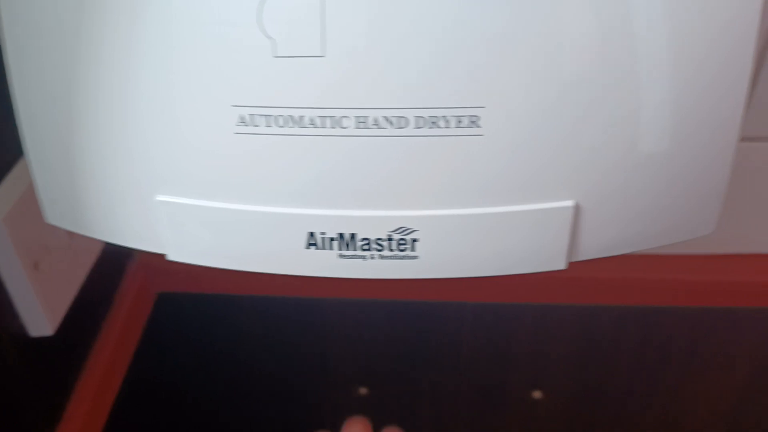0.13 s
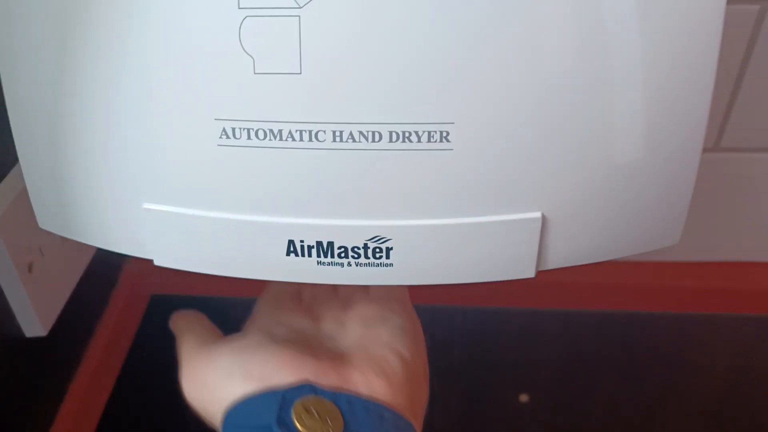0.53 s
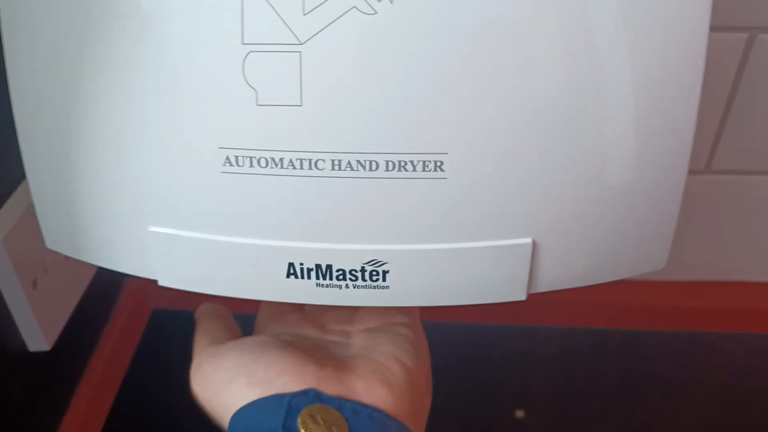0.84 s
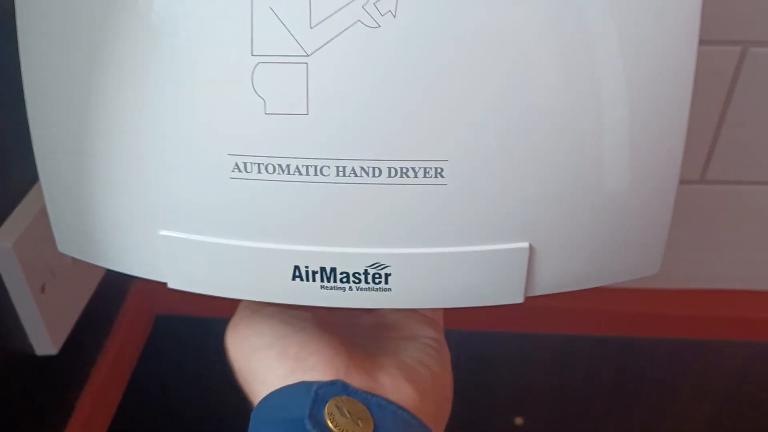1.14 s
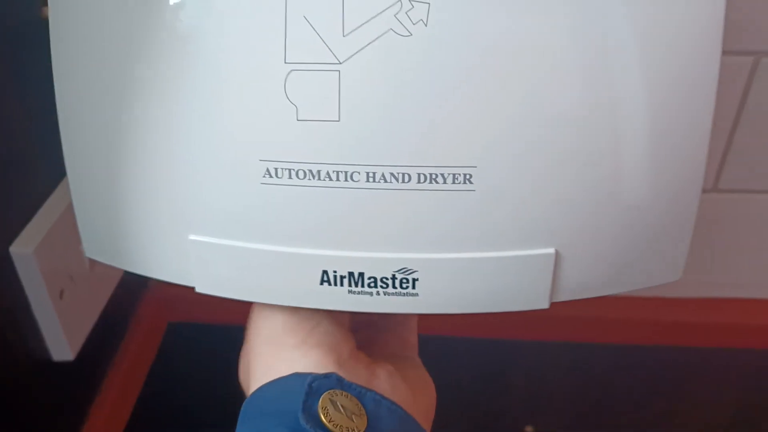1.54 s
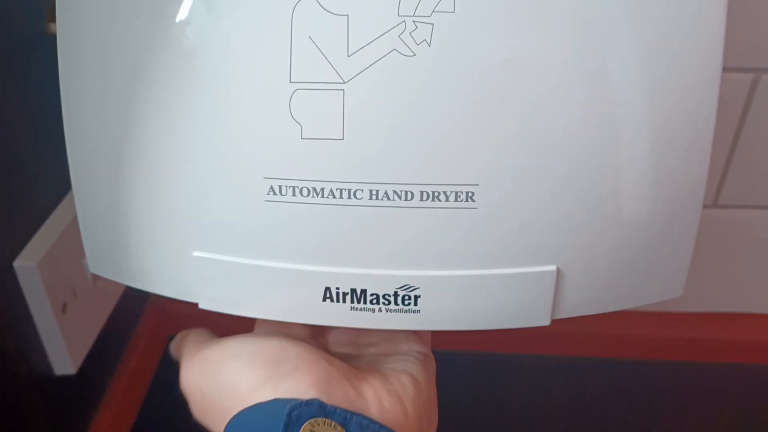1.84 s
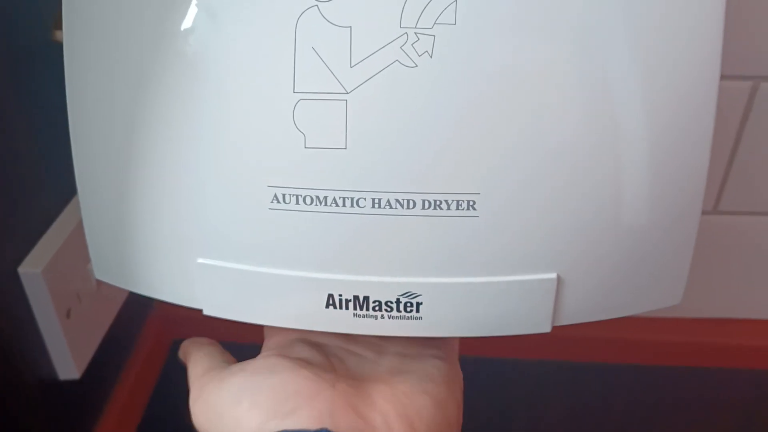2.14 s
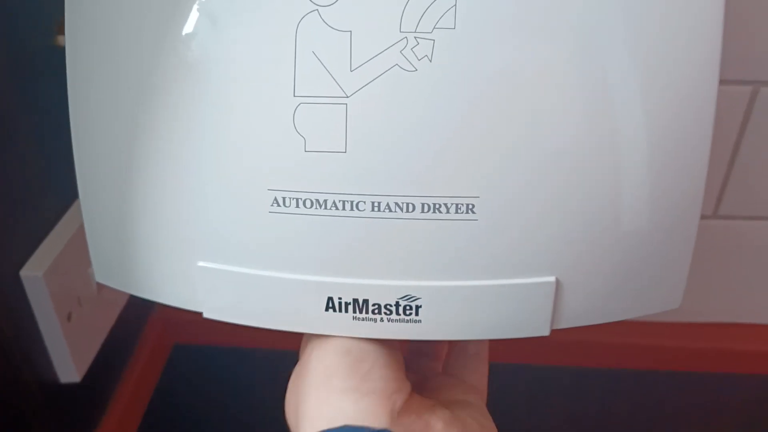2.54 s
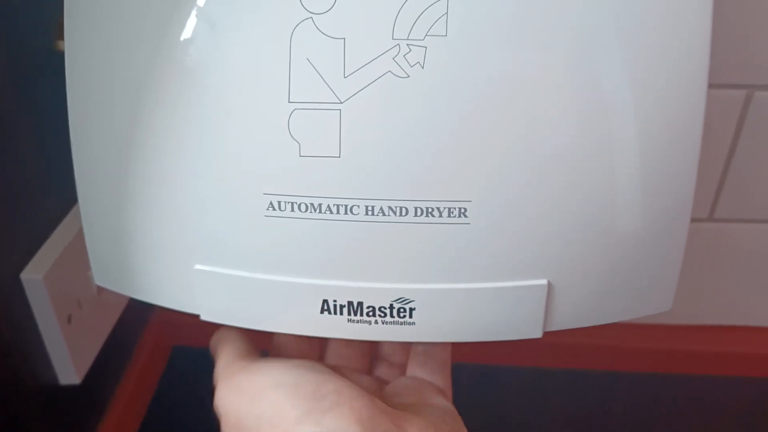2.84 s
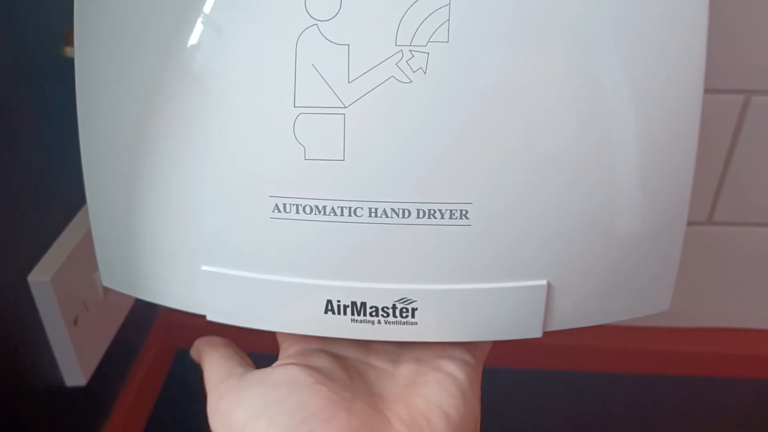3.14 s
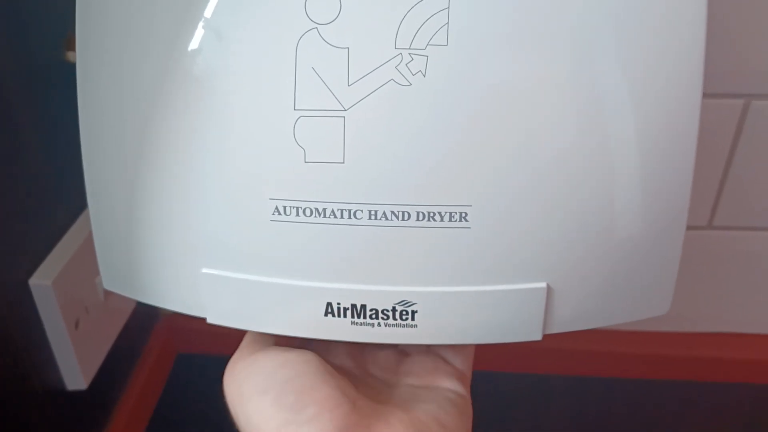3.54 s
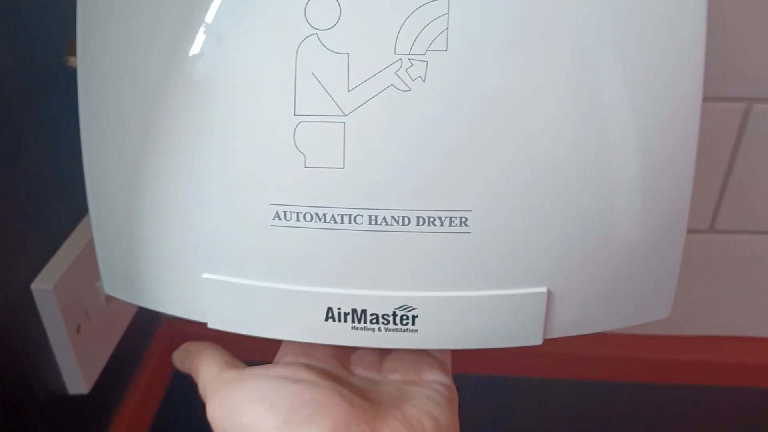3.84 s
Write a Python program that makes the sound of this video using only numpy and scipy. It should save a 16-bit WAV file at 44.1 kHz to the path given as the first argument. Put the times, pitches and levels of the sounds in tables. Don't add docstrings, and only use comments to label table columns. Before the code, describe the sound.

A hand dryer starts up close to a phone in a tiled washroom. Faint ventilation wash opens, then a hard, bouncing relay clack at 0.36 s rings briefly off the tiles as the wash sinks away. From 0.6 s the motor spins up with a short whistle and low buffeting, reaching full hissing, droning airflow by 1.2 s. Bright metallic rattles ring out around 2.1, 2.6, 3.0 and 3.5 s; airflow continues to the end.

```python
import sys
import numpy as np
from scipy import signal
from scipy.fft import rfft, irfft
from scipy.io import wavfile
from scipy.ndimage import uniform_filter1d

SR = 44100
rng = np.random.default_rng(int(sys.argv[2]) if len(sys.argv) > 2 else 0)


def gain_from_decibels(decibels):
    exponent = np.asarray(decibels, float) / 20
    return 10 ** exponent


def output_pcm(signal):
    pcm = np.clip(np.atleast_2d(signal).T, -1, 1) * 32767
    wavfile.write(sys.argv[1], SR, np.round(pcm).astype(np.int16))


N = 176400
T, HZ = np.arange(N) / SR, np.fft.rfftfreq(N, 1 / SR)

# time_s, level_db
FLOW = [(.6, -75), (.7, -54.5), (.76, -51.5), (.85, -44.5), (1.04, -38.5), (1.3, -37.5), (2.1, -37.5),
        (3.2, -38.5), (4, -37)]
FULL_FLOW_DB = -38


def evened(x):
    return x / np.sqrt(np.mean(x ** 2) + 1e-20)


def read(points, hz):
    f, value = np.transpose(points)
    return np.interp(np.log(hz + 1), np.log(f + 1), value)


def curve(points, t, before=-120):
    return np.interp(t, *np.transpose(points), left=before)


def bell(hz, width_hz):
    return 1 / (1 + (2 * (HZ - hz) / width_hz) ** 2)


def lifted(peaks):
    power = sum((gain_from_decibels(lift_db) ** 2 - 1) * bell(hz, width_hz) for hz, width_hz, lift_db in peaks)
    return np.sqrt(1 + power)


def noise(gain, same=None):
    # freq_hz, share
    likeness = [(25, .85), (60, 0.9), (130, 0.98), (290, 0.97), (640, 0.51), (1200, 0.32), (2500, 0.17),
                (5000, 0.07), (15000, 0.11)]
    # freq_hz, lead_rad
    lead = [(100, -0.9), (250, 0.25), (900, 1), (1100, -0.36), (1400, -2.5), (3190, -1), (4820, -3),
            (6290, 2.5)]
    a, b, c, d = rng.standard_normal((len(HZ), 4)).T
    same = np.clip(read(likeness, HZ) if same is None else same, -1, 1)
    left = a + 1j * b
    shared = same * left * np.exp(-1j * read(lead, HZ))
    right = shared + np.sqrt(1 - same ** 2) * (c + 1j * d)
    return evened(irfft(gain * np.array([left, right]), N))


def slow(top_hz):
    rates_hz = np.geomspace(.5, top_hz, 24)
    return evened(sum(np.sin(2 * np.pi * (f * T + rng.random())) / np.sqrt(f) for f in rates_hz))


def room_tone():
    # freq_hz, density_db
    spectrum = [(40, -22), (110, -12), (220, -2), (420, -9), (700, -14.5), (1790, -14), (4410, -11),
                (15800, -20.5)]
    # time_s, level_db
    phone_gain = [(.08, -51), (.2, -50.5), (.35, -53.5), (.46, -54), (.56, -59.5), (.64, -64), (.68, -66),
                  (.71, -77), (.8, -79)]
    lift_db = 11.5
    return noise(gain_from_decibels(read(spectrum, HZ))) * gain_from_decibels(curve(phone_gain, T, before=phone_gain[0][1]) + lift_db)


def tiles(x):
    # freq_hz, t60_s
    decay = [(300, 0.31), (3000, 0.58), (14000, 0.65)]
    hz, t, z = signal.stft(rng.standard_normal((2, SR)), SR, nperseg=256)
    tail = signal.istft(z * gain_from_decibels(-60 * t / read(decay, hz)[:, None]), SR, nperseg=256)[1]
    return signal.fftconvolve(x[None], tail / np.linalg.norm(tail[0]), axes=1)[:, :N]


def relay():
    # start_s, level_db
    clacks = [
        (.3585, -31),
        (.361, -29),
        (.365, -28),
        (.369, -33),
        (.379, -39),
    ]
    # freq_hz, level_db, t60_s
    housing = [(646, 2.5, 0.044), (827, 1.5, 0.045), (893, 1.5, 0.033), (1090, -5, .02), (1420, -4, 0.021),
               (1740, 1.5, 0.009), (2106, 5, 0.046), (2200, -15, 0.06), (2866, -10, 0.013),
               (3980, -4, 0.024), (4490, -8, 0.012), (5090, -4.5, 0.0073)]
    spit_hz, spit_db, spit_t60_s = 12600, 0, 0.042
    crack_db, crack_t60_s = 7, .02
    wet_db = 1.5
    t = T[:SR // 2]
    ring = sum(gain_from_decibels(db - 60 * t / t60_s) * np.sin(2 * np.pi * hz * t) * (-1) ** k
               for k, (hz, db, t60_s) in enumerate(housing))
    spit = signal.lfilter(*signal.butter(4, spit_hz, "high", fs=SR), rng.standard_normal(len(t)))
    spit = spit * gain_from_decibels(spit_db - 60 * t / spit_t60_s)
    crack = signal.lfilter(*signal.butter(1, [600, 6000], "band", fs=SR), rng.standard_normal(len(t)))
    crack = crack * gain_from_decibels(crack_db - 60 * t / crack_t60_s)
    hits = np.zeros(N)
    for start_s, db in clacks:
        hits[round(start_s * SR)] = gain_from_decibels(db)
    direct = signal.fftconvolve(hits, ring + spit + crack)[:N]
    direct = signal.lfilter(*signal.butter(2, 300, "high", fs=SR), direct)
    return direct + gain_from_decibels(wet_db) * tiles(direct)


def rattle(modes, start_s, rise_s, hold_s, t60_s, level_db, cluster_db, rasp_db):
    # freq_hz, density_db
    scrape = [(3500, -7.5), (5000, -5), (7400, -18), (9000, -25), (10500, -10), (11400, -32), (12300, -14),
              (15000, -26)]
    ring_hz, skirt_hz, skirt_db = 6.8, 200, -0.5
    line_db, line_wander_db, line_drift_hz = 1.5, 1.5, 3
    sharp_gain, skirt_gain = gain_from_decibels(-6) ** 2 / ring_hz, gain_from_decibels(skirt_db + cluster_db) ** 2 / skirt_hz
    power = sum(gain_from_decibels(db) ** 2 * (sharp_gain * bell(hz, ring_hz) ** 2 + skirt_gain * bell(hz, skirt_hz) ** 2)
                for hz, db in modes)
    total = np.sqrt(sum(gain_from_decibels(db) ** 2 for _, db in modes))
    rise = np.clip((T - start_s) / rise_s, 0, 1)
    shape = rise * gain_from_decibels(-60 * np.maximum(T - start_s - rise_s - hold_s, 0) / t60_s)

    live = slice(round(start_s * SR), round((start_s + .8) * SR))
    chance = rng.standard_normal((len(modes), 3, len(T[live])))
    chance = evened(uniform_filter1d(chance, size=1500, axis=2))
    lines = np.zeros((2, N))
    for (hz, db), c in zip(modes, chance):
        phase = 2 * np.pi * np.cumsum(hz + line_drift_hz * c[2]) / SR + 6 * c[:2, :1]
        lines[:, live] += gain_from_decibels(db + line_wander_db * c[:2]) * np.sin(phase)

    rasp = evened(gain_from_decibels(read(scrape, HZ)) * (HZ > 1200))
    wash = noise(evened(np.sqrt(power)) + gain_from_decibels(rasp_db) * rasp, same=0.28)
    wash = wash * total * gain_from_decibels(-1 + 0.84 * slow(40))
    return (wash + lines * gain_from_decibels(line_db - abs(cluster_db))) * shape * gain_from_decibels(level_db + 6.5)


def pings():
    # start_s, level_db
    knocks = [
        (2.62, -31),
        (2.67, -35),
        (2.80, -37),
        (2.826, -35),
        (2.89, -40),
    ]
    ping_hz, rise_s, t60_s = 2320, .01, .25
    shape = np.zeros(N)
    for start_s, db in knocks:
        since_s = np.maximum(T - start_s, 0)
        shape += np.minimum(since_s / rise_s, 1) * gain_from_decibels(db - 60 * since_s / t60_s)
    return shape * np.sin(2 * np.pi * ping_hz * T + np.array([[0], [.5]]))


def loose_metal():
    # freq_hz, level_db
    tab = [(3600, -42.5), (4800, -53), (6980, -51), (10400, -67)]
    plate = [(1637, -47), (2315, -52), (2611, -39.5), (3575, -42), (3603, -40), (3632, -42), (3930, -45),
             (4786, -45), (5168, -55), (6207, -47), (6363, -59), (6682, -46), (6973, -39.5), (7239, -49.5),
             (7530, -51), (8366, -53), (8629, -50), (9600, -67), (10287, -52), (10520, -55), (10761, -48.5),
            (12080, -50), (12435, -58), (12941, -48), (13464, -62), (14018, -49), (14912, -55),
            (15606, -56)]
    hook = [(2315, -47.5), (2885, -48), (4199, -48.5), (6200, -51.5), (8400, -60), (10350, -60),
            (13200, -63), (15380, -62)]
    catch = [(3634, -51), (6239, -53.5), (6982, -52.5), (7531, -56), (8600, -58), (10300, -64),
             (12080, -60), (14018, -65)]
    clasp = [(2369, -53), (3580, -53), (3860, -53), (6961, -56), (8705, -64), (9577, -63), (12102, -55.5),
             (14030, -66)]
    # start_s, rise_s, hold_s, t60_s, level_db
    rattles = [
        (2.033, 0.033, 0.087, 0.26, -1.5),
        (2.134, 0.03, 0.11, 0.81, 0.5),
        (2.614, 0.0089, 0.068, 1, 0.5),
        (2.98, 0.021, 0.039, 0.63, 4.5),
        (3.46, .02, .05, 0.45, -3.5),
        (3.593, 0.017, 0.048, 0.6, 4),
        (2.79, .015, 0.031, 0.48, -6.5),
    ]
    # cluster_db, rasp_db
    mixes = [(3, 2), (1.5, -7.5), (-8, 5), (10.5, 1.5), (10, -8), (3.5, -3), (-2, 8)]
    parts = [tab, plate, hook, catch, clasp, clasp, hook]
    lean_db = -1
    metal = sum(rattle(part, *row, *mix) for part, row, mix in zip(parts, rattles, mixes)) + pings()
    return metal * gain_from_decibels(lean_db / 2 * np.array([[1], [-1]]))


def buffet():
    # time_s, level_db
    gusts = [(.4, -62), (.6, -47), (.7, -65), (.8, -47), (.9, -47), (.97, -39), (1.04, -47), (1.12, -53.5),
             (1.18, -37.5), (1.31, -42), (1.55, -44), (2.5, -47), (3.4, -49), (3.83, -39), (4, -53.5)]
    room_hz, width_hz, slope_db_per_oct = 105.4, 10.6, 10
    steeper = np.where(HZ > room_hz, 3, 1)
    slope = gain_from_decibels(-slope_db_per_oct * abs(np.log2((HZ + 1) / room_hz)) * steeper)
    slope = slope / np.sqrt(1 + (50 / (HZ + 1)) ** 8)
    return noise(slope * lifted([(room_hz, width_hz, 8)])) * gain_from_decibels(curve(gusts, T) + 2 * slow(16))


def whine():
    # time_s, pitch_hz, level_db
    glide = [(.61, 740, -75), (.64, 780, -59), (.71, 869, -57), (.745, 830, -51), (.78, 830, -68)]
    time_s, pitch_hz, db = np.transpose(glide)
    turns = np.cumsum(np.interp(T, time_s, pitch_hz) * (1 + .01 * slow(41))) / SR
    return np.sqrt(2) * np.sin(2 * np.pi * turns) * gain_from_decibels(np.interp(T, time_s, db, left=-120, right=-120))


def fan():
    # shaft_multiple, level_db
    orders = [(16, -50.5), (18, -55), (24, -52)]
    shaft_hz, start_s, spin_s, waver = 48.93, .5, .12, 0.00307
    flow_share, wander_db = .8, 2.5
    speed = 1 - np.exp(-np.maximum(T - start_s, 0) / spin_s)
    turns = np.cumsum(shaft_hz * speed * (1 + waver * slow(8))) / SR
    tones = np.zeros((2, N))
    for k, db in orders:
        phase = 2 * np.pi * round(k) * turns + rng.uniform(0, 1.0, (2, 1))
        tones += gain_from_decibels(db + wander_db * slow(8.1)) * 1.97 * np.sin(phase)
    return tones * gain_from_decibels(flow_share * (curve(FLOW, T, before=-160) - FULL_FLOW_DB))


def hum():
    # time_s, level_db
    drive = [(0.37, -50), (0.59, -35), (0.73, -56.5), (1.05, -24), (1.14, -35.5), (1.23, -17), (1.3, -38),
             (1.34, -24), (1.37, -29.5), (2.04, -33), (2.11, -58), (2.28, -28), (2.68, -38.5), (2.87, -21),
             (2.9, -37.5), (3.73, -34.5), (3.79, -41), (4.0, -35)]
    panel_hz, drift_hz, wander_db, lead_rad = 242.9, 4.06, 0.5, .25
    turns = np.cumsum(panel_hz + drift_hz * slow(25.27)) / SR
    note = np.sqrt(2) * np.sin(2 * np.pi * turns - np.array([[0], [lead_rad]]))
    return note * gain_from_decibels(curve(drive, T) - 2.5 + wander_db * slow(30))


def drone():
    # time_s, level_db
    effort = [(0.37, -41.5), (0.82, -40), (1.23, -24), (1.27, -28.5), (2.06, -28), (2.09, -33.5),
              (2.25, -31), (3.67, -27), (3.84, -31.5), (4.0, -26)]
    # freq_hz, density_db
    spectrum = [(76, -66), (130, -13.5), (253, -2), (333, -5.5), (383, -8.5), (477, -22.5), (600, -13),
                (780, -29), (1320, -120)]
    # freq_hz, width_hz, lift_db
    casing = [(169, 10.3, 10), (247, 13, 6.5), (266, 43, 6.5), (325.6, 31, 3), (378.7, 29, 7),
              (408.7, 14, 9)]
    base_db = read(spectrum, HZ) - 30 * np.log2(np.maximum(HZ / 600, 1))
    return noise(gain_from_decibels(base_db) * lifted(casing)) * gain_from_decibels(curve(effort, T) + 0.31 * slow(26))


def jet():
    # freq_hz, density_db
    spectrum = [(240, -50), (400, -4.5), (654, -12), (1050, -6), (1810, -12), (2040, -13.5), (2650, -12.5),
                (3780, -15.5), (15800, -28.5)]
    # freq_hz, width_hz, lift_db
    duct = [(701, 18, 7.5), (822, 32, 6.5), (1053, 20, 8), (1240, 230, 3), (1603, 40, 6.5), (2064, 59, 9),
            (2303, 170, 7), (3940, 640, 6)]
    jet_db, step_hz, step_db = 6, 7600, -6.5
    dull_per_oct = 0.19
    base_db = read(spectrum, HZ) - 24 * np.log2(np.maximum(400 / (HZ + 1), 1))
    base_db = base_db + step_db / (1 + np.exp(np.clip((step_hz - HZ) / 80, -50, 50)))
    hz, t, z = signal.stft(noise(gain_from_decibels(base_db) * lifted(duct)), SR, nperseg=512, noverlap=384)
    patches = rng.standard_normal((len(t), len(hz))).T
    patches = uniform_filter1d(patches, size=6, axis=0)
    patches = evened(uniform_filter1d(patches, size=24, axis=1))
    flow_db = curve(FLOW, t, before=-71)
    octaves = np.log2(np.maximum(hz, 500) / 1000)[:, None]
    dull_db = np.minimum(flow_db - FULL_FLOW_DB, 0) * dull_per_oct * octaves
    z = z * gain_from_decibels(flow_db + jet_db + dull_db + 0.21 * patches)
    return signal.istft(z, SR, nperseg=512, noverlap=384)[1][:, :N] * gain_from_decibels(0.47 * slow(30))


def scene():
    room = room_tone() + buffet() + relay() + loose_metal()
    dryer = whine() + fan() + hum() + drone() + jet()
    return room + dryer


def top_cut(x):
    return signal.sosfilt(signal.butter(12, 16350, fs=SR, output="sos"), x)


def record(dry):
    # freq_hz, level_db
    lean = [(130, 1), (290, -1.1), (640, 0.5), (1410, 0), (3100, -7.5), (5500, -7), (9000, -1), (15000, 5)]
    open_s, edge_hz = .0765, 15810
    half_db = read(lean, HZ) / 2
    mix = irfft(rfft(dry) * gain_from_decibels(np.array([half_db, -half_db])) * (HZ < edge_hz), N)
    mix = mix * np.clip((T - open_s) / 0.001, 0, 1)
    return top_cut(mix)


dry = scene()
out = record(dry)
output_pcm(out)
```